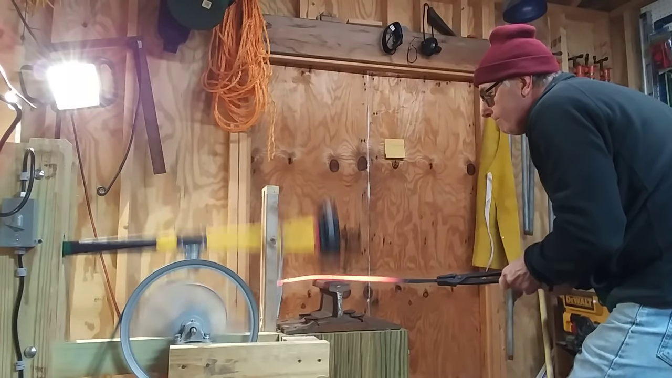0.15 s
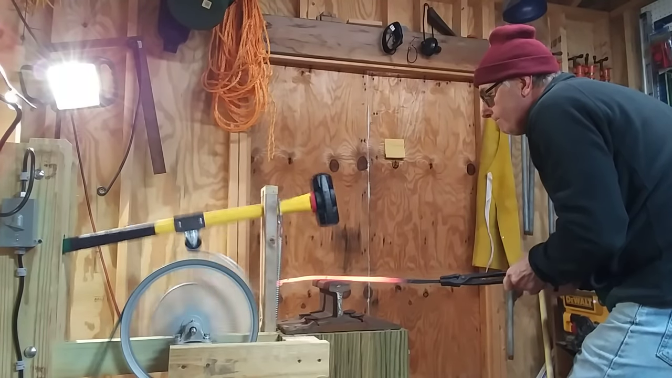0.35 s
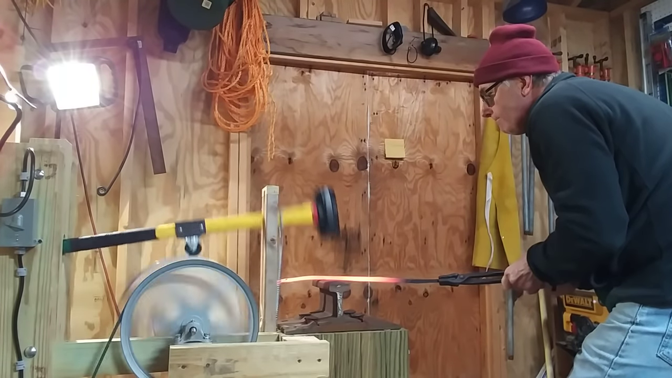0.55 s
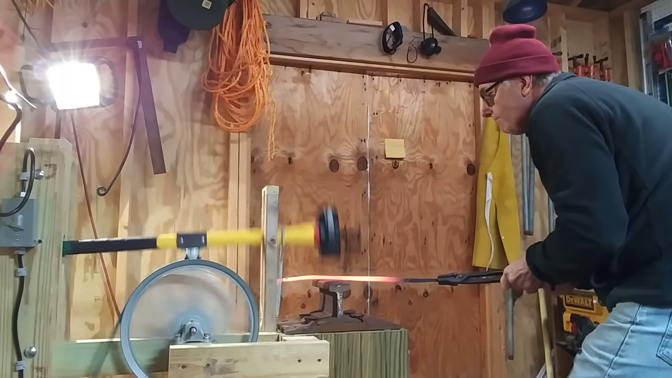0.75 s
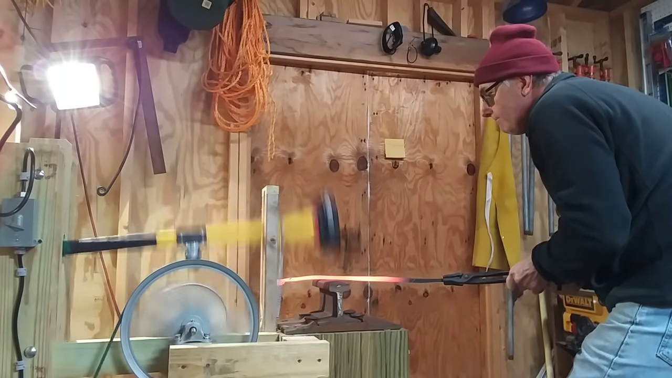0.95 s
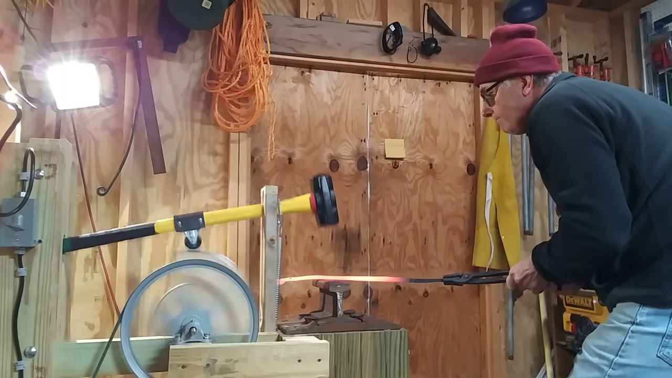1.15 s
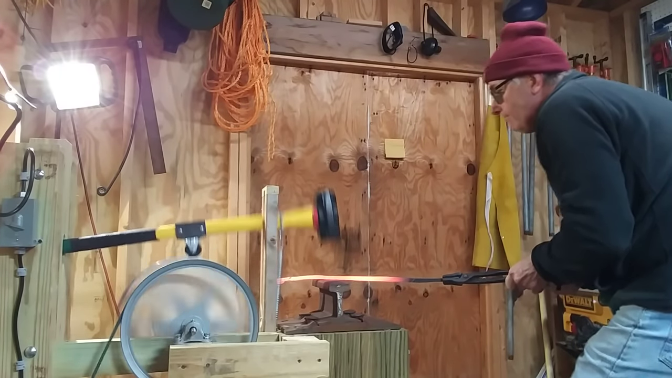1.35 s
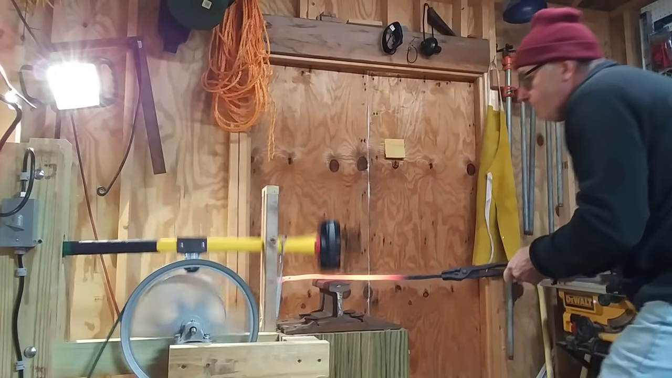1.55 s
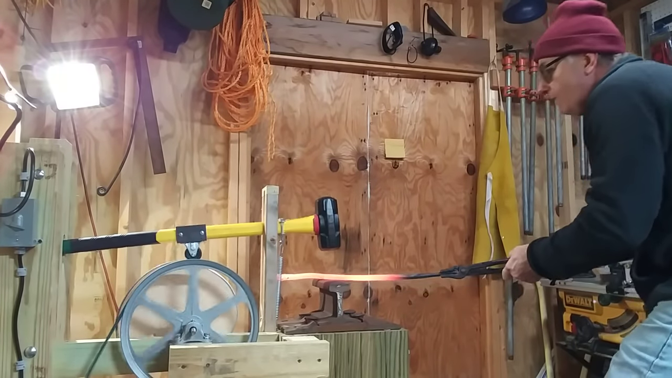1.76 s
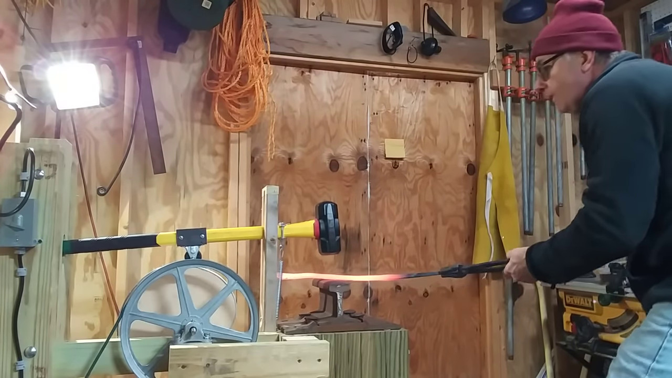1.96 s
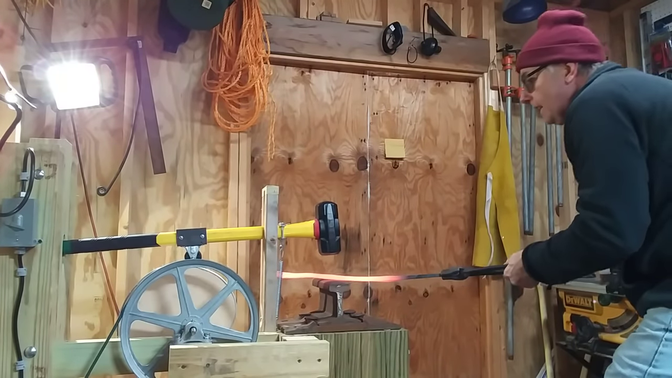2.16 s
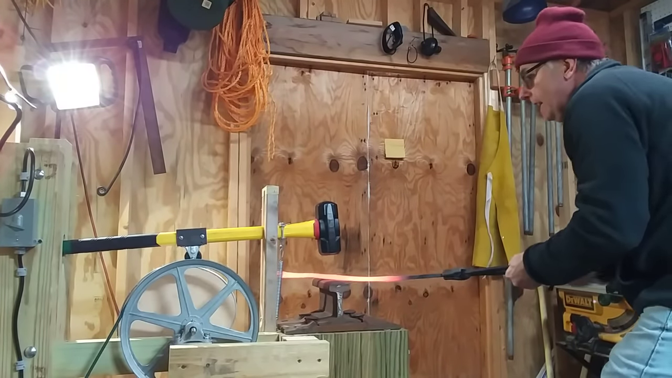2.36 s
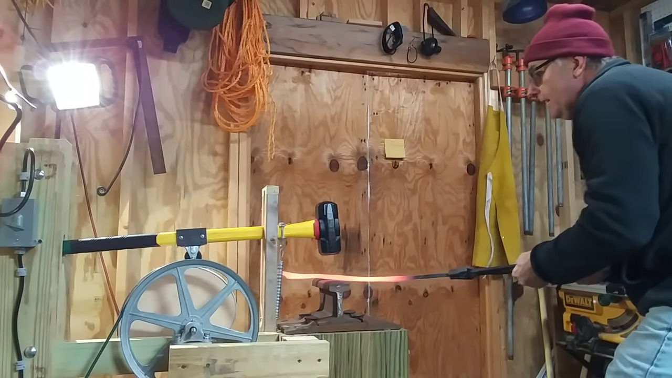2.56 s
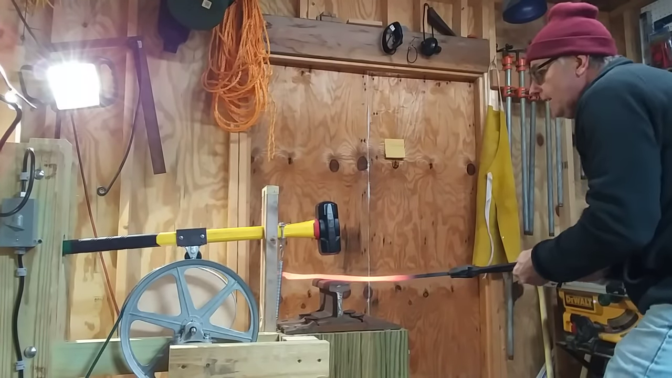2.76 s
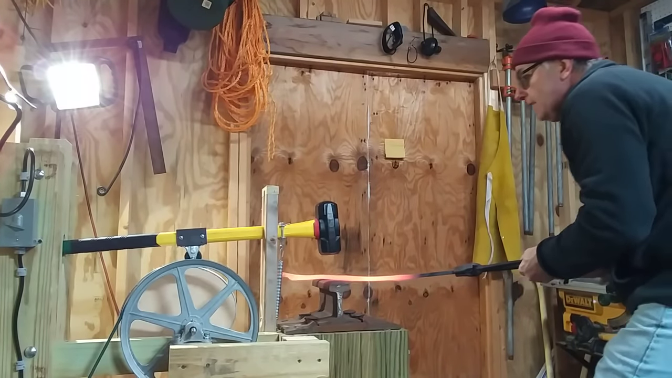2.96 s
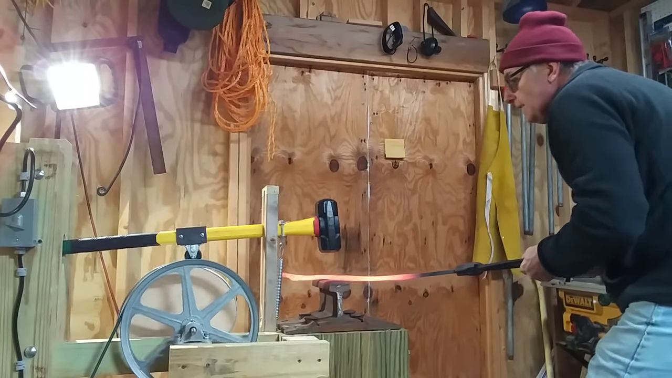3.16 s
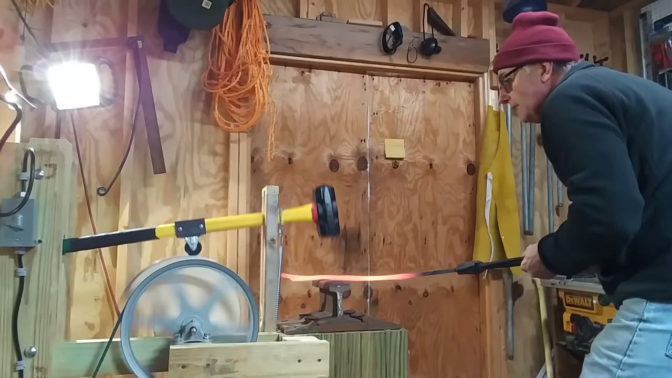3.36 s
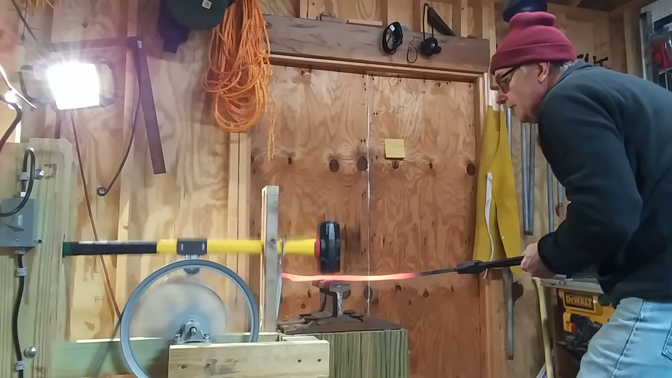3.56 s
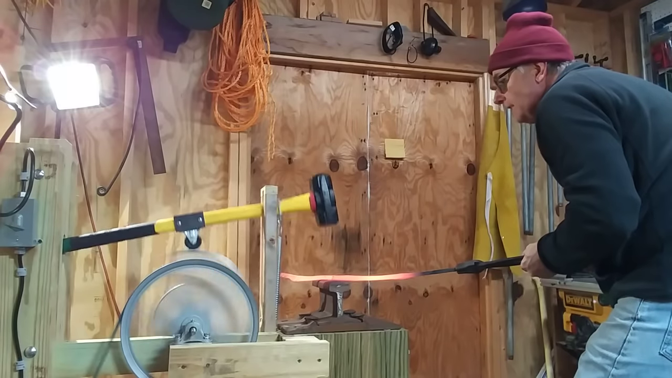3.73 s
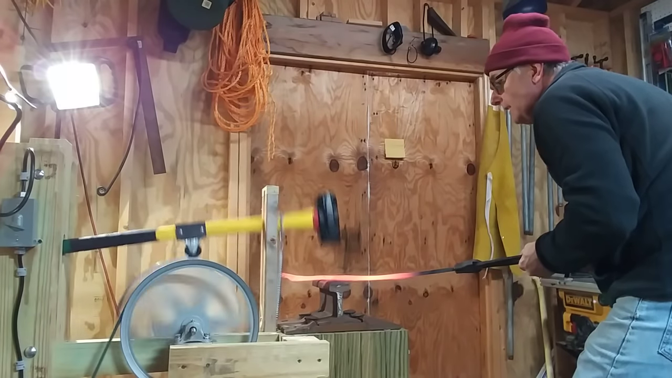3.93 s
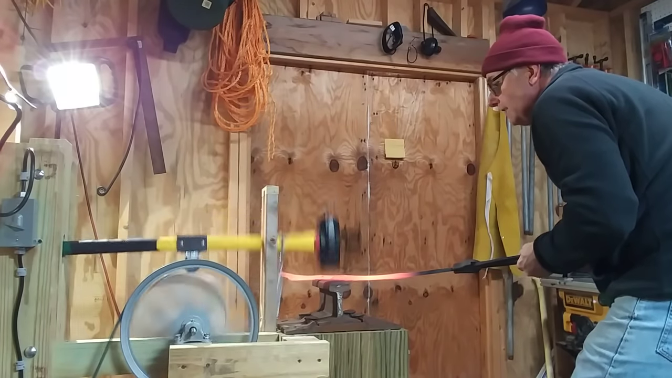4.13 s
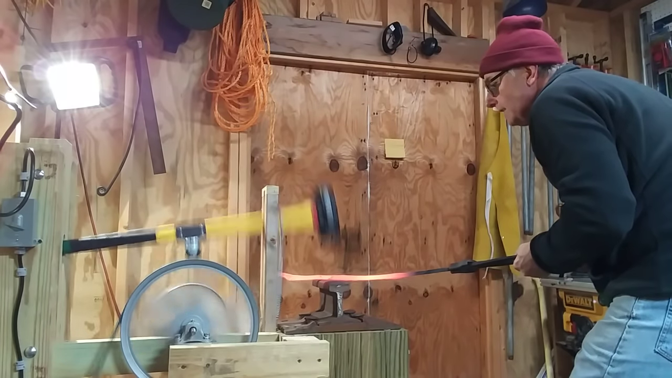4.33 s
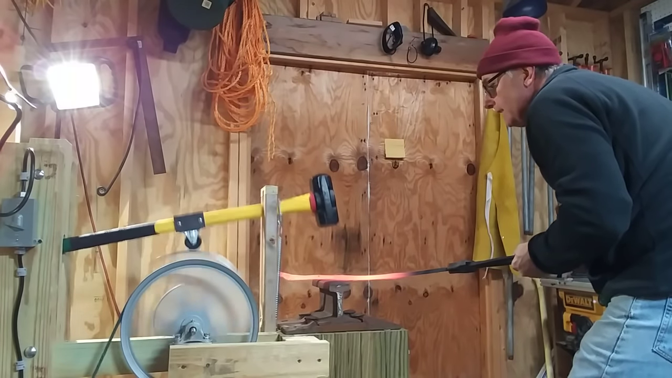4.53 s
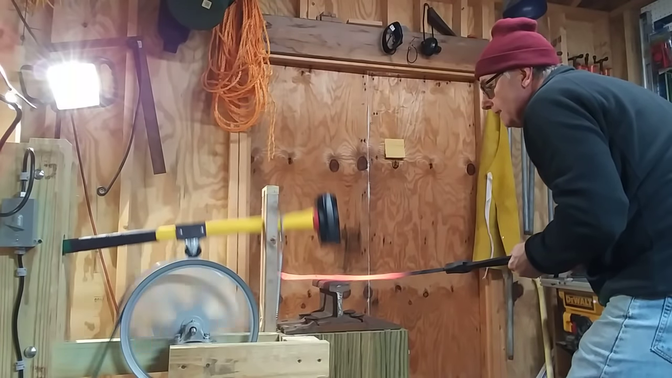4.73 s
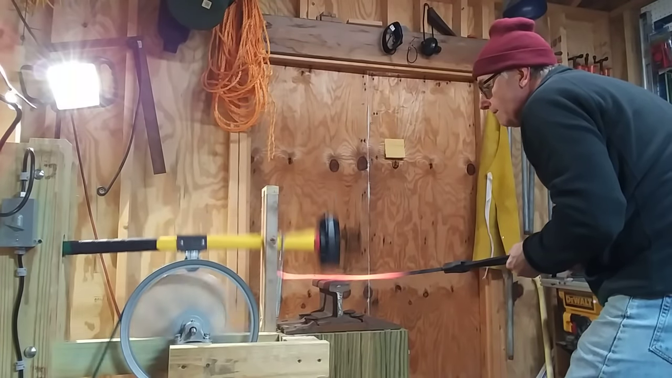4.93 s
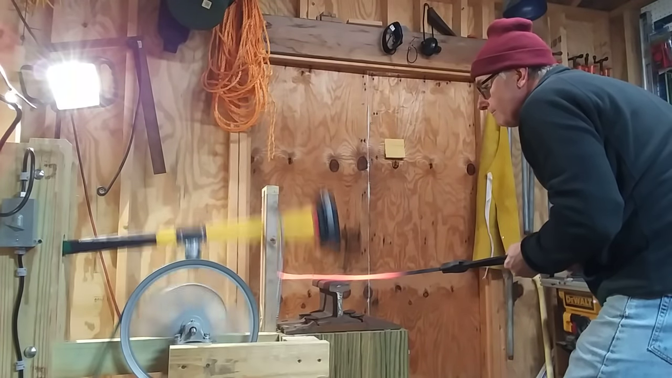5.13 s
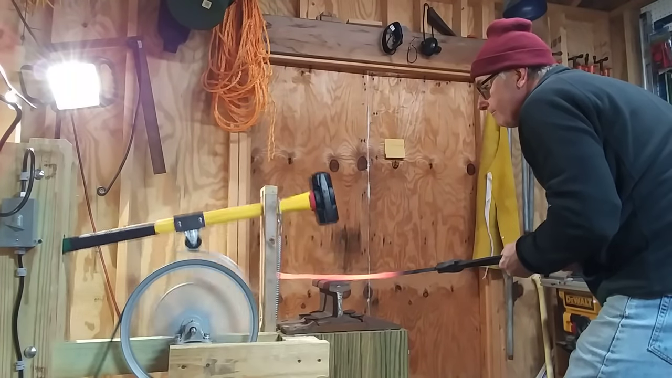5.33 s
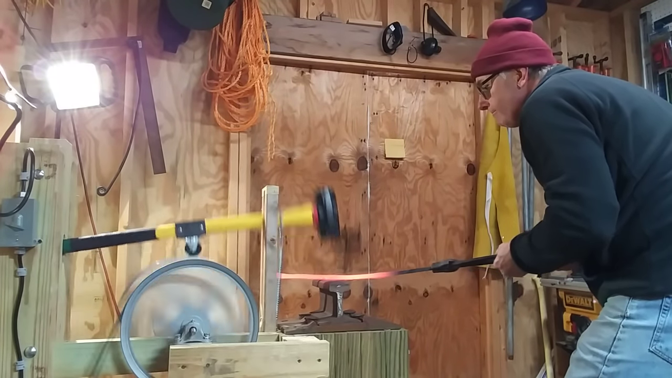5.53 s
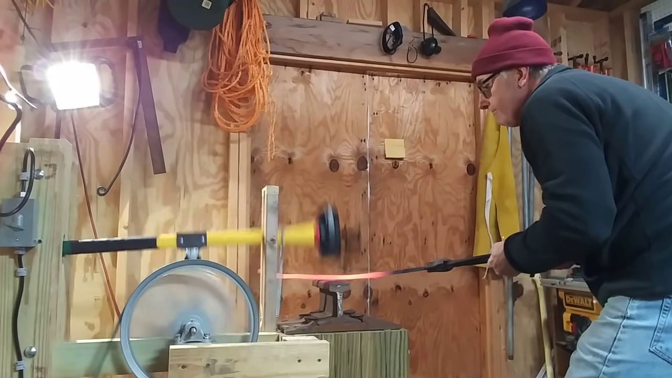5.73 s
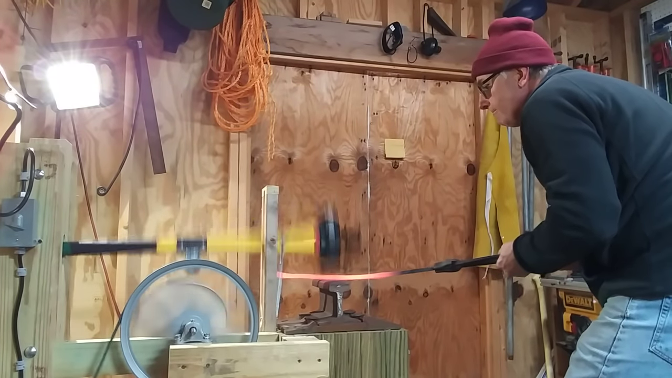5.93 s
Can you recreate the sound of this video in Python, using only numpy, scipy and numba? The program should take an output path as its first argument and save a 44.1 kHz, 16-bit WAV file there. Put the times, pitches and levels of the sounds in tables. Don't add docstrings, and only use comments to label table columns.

```python
import sys
import numpy as np
from scipy import signal
from scipy.fft import rfft, irfft, next_fast_len
from scipy.io import wavfile
from scipy.ndimage import uniform_filter1d, minimum_filter1d, map_coordinates
from numba import njit

SR = 44100
rng = np.random.default_rng(int(sys.argv[2]) if len(sys.argv) > 2 else 0)


def put_to_file(sound):
    columns = np.atleast_2d(sound).T
    safe = np.clip(columns, -1, 1)
    whole_steps = np.round(safe * 32767)
    wavfile.write(sys.argv[1], SR, whole_steps.astype(np.int16))


def decibels_to_gain(level_db):
    exponent = np.asarray(level_db, float) / 20
    return 10 ** exponent


N = 264159
T = np.arange(N) / SR

# time in seconds, belt noise in dB.
EFFORT = [
    (0, -32),
    (1.7, -34),
    (1.85, -34.5),
    (2.0, -35.5),
    (2.5, -38.5),
    (2.98, -38.5),
    (3.1, -35.5),
    (3.45, -35.5),
    (6, -30),
]
# frequency in Hz, level in dB per Hz.
MOTOR_BODY = [(110, -88), (190, -70), (228, -21.5), (446, -16), (586, -12), (882, -9), (927, -8),
              (1310, -5.5), (1500, -22), (2210, -9), (2290, -59), (2380, -16), (3500, -23), (4550, -40),
              (7700, -120)]
MOTOR_HISS = [(150, -28), (215, -1.5), (1760, 3), (3000, 0.5), (3930, -7.5), (4300, -2), (5020, -4),
              (6460, -18), (7500, -26), (8500, -13), (9450, -23.5), (12000, -25), (16000, -36)]
# frequency in Hz, width in Hz, #
# height in dB (negative for a gap).
CASING = [(3420, 33, 6), (3560, 70, -9), (3720, 60, 7), (4060, 190, -12), (4320, 68, 8), (4570, 61, -1),
          (5120, 60, 6), (5300, 43, 7), (5900, 100, -9), (8150, 270, 6.5)]
# multiple of the mains tone, level in dB rms.
MAINS = [(2, -64.5), (3, -58.5), (4, -57), (5, -43), (6, -45.5), (8, -46), (9, -52), (10, -53)]
# frequency in Hz, dB rms.
SHAFT = [(570, -47.5), (806, -51), (1104, -46), (1281, -51.5), (1744, -47), (1965, -59), (2460, -51.5),
         (2760, -56), (3030, -53.5), (4320, -61.5), (4587, -60), (4861, -60)]
COASTING = [(120, -47.5), (330, -55), (505, -52), (1314, -48), (1523, -50), (1583, -50), (1631, -50),
            (1680, -40.5), (2643, -66)]
DRAGGING = [(120, -52), (490, -45.5), (800, -51.5), (1140, -60), (1190, -54), (2420, -56), (1730, -51.5),
            (2700, -51)]
# frequency in Hz, level in dB per Hz.
AIR = [(3000, -30), (6000, -3), (7500, 0), (10000, -3.5), (12500, -11), (15500, -15)]

# start in seconds, peak in dB,
# roller ring in Hz, ring level in dB, scuff level in dB.
CAM = [(0.08, 2, 4570, -42, -13), (0.35, 2.5, 4480, -30, -12), (0.62, 4, 4560, -30, -26),
       (0.891, 3, 4630, -19, -13.5), (1.163, 3.5, 4570, -26, -16.5), (1.445, 0, 4600, -14, -23),
       (1.689, -5, 4600, -34, -32), (3.471, -0.5, 4620, -9.5, -18), (3.741, 5.5, 4400, -11, -17.5),
       (4.013, 2.5, 4300, -11.5, -12.5), (4.282, 3, 4530, -11.5, -12), (4.547, 3, 4450, -7.5, -29),
       (4.812, 2.5, 4640, -8, -15.5), (5.075, 1, 4620, -6, -17), (5.334, 2.5, 4600, -8, -15.5),
       (5.597, 3.5, 4320, -28, -16), (5.857, 1.5, 4640, -12, -13)]
# frequency in Hz, level in dB per Hz.
CAM_COLOUR = [(120, -62), (200, -14.5), (401, -9), (548, -12), (836, 3.5), (916, 0.5), (1020, -0.5),
              (2510, -22.5), (4600, -20), (5230, -25.5), (16000, -46)]
SCUFF_COLOUR = [(1200, -23), (2200, 13.5), (3700, 9.5), (4700, 11), (6300, -13), (7200, -59), (10000, -9),
                (16000, -49)]
# frequency in Hz, level in dB, 60 dB decay in seconds.
ROLLER = [(4408, 2, .14), (4478, 4, .24), (4552, 1, .12), (4645, 3, .12), (9027, -16, .08),
          (9237, -15, .07)]

# start in seconds, peak in dB, brightness in dB, rattle in dB.
BLOWS = [(0.165, -0.5, -3, -5), (0.435, -8.5, -5.5, 2), (0.701, -1.5, -0.5, 0.5), (0.977, -0.5, -2, -3),
         (1.249, -1, 2.5, 3), (1.529, -0.5, 2.5, 4.5), (3.552, -0.5, 2.5, -7), (3.823, -1.5, 5, 4),
         (4.097, -1, 1, 1), (4.365, -0.5, 2.5, 2.5), (4.629, -1.5, 3, 2), (4.895, 0, 3, -1),
         (5.156, -0.5, 2, -1.5), (5.415, -0.5, -0.5, -2), (5.679, -0.5, 1.5, -0.5), (5.937, -1, -1, 1.5)]
# frequency in Hz, level in dB per Hz.
BLOW_COLOUR = [(120, -65), (200, -11.5), (409, -6), (883, 1.5), (1400, -0.5), (2650, -11.5), (3620, -13),
               (6200, -19), (7200, -38), (9500, -25.5), (12000, -36.5), (15500, -34), (16500, -44)]
CRACK_COLOUR = [(1500, -3), (3000, 6), (6000, -11), (10000, 10), (13000, -16), (16000, -29)]
RATTLE_COLOUR = [(1500, 2), (3000, 16), (6000, 4), (10000, -1), (13000, -6.5), (16000, -15)]
# frequency in Hz, width in Hz, height in dB.
FRAME = [(241.4, 45, 4), (303, 15, 3.5), (422.2, 13.7, 11), (492, 99, 5), (716, 40, 3.5), (754, 50, 0),
         (843, 12, 3), (1040, 11, 7.5), (1358, 25, 5.5), (1747, 115, 3), (1850, 91, 1.5), (2087, 260, 5.5),
         (2330, 79, 2), (3010, 29, 9.5), (3450, 12, 1)]
# frequency in Hz, level in dB, 60 dB decay in seconds.
ANVIL = [(2235, -4.5, 0.041), (3030, -17, 0.3), (3500, -25, 0.096)]
# frequency in Hz, 60 dB decay in seconds.
SHOP = [(200, 0.46), (1000, 0.46), (3000, 0.37), (6000, 0.28), (9000, 0.23), (15000, 0.13)]
# seconds after the blow, level in dB.
REBOUNDS = [
    (.011, -4),
    (.019, -3.5),
    (.039, -8),
    (.049, -7),
]
# start in seconds,
# level in dB.
RATTLES = [(-0.001, -31), (0.016, -33), (0.101, -29), (0.183, -22), (0.203, -30), (0.379, -36),
           (0.404, -41), (0.505, -34), (0.566, -37), (0.584, -47), (0.655, -35), (0.687, -26), (0.741, -24),
           (0.77, -30), (0.828, -35), (0.951, -36), (1.064, -34), (1.116, -36), (1.142, -36), (1.172, -33),
           (1.235, -26), (1.292, -25), (1.398, -41), (1.491, -29), (1.602, -30), (1.684, -35), (3.496, -29),
           (3.594, -25), (3.704, -41), (3.808, -32), (3.842, -22), (3.911, -27), (3.929, -32), (3.95, -33),
           (4.003, -43), (4.023, -35), (4.072, -31), (4.291, -26), (4.377, -21), (4.386, -22), (4.403, -22),
           (4.409, -21), (4.495, -35), (4.666, -13), (4.713, -34), (4.821, -22), (5.037, -42), (5.063, -38),
           (5.127, -35), (5.252, -32), (5.272, -37), (5.289, -38), (5.318, -40), (5.369, -36), (5.433, -14),
           (5.438, -26), (5.534, -30), (5.865, -17)]

# start in seconds, peak in dB, brightness in dB.
TICKS = [
    (1.116, -12.5, -3),
    (4.343, -6.5, -4),
    (4.805, -28, 1),
    (5.148, -19, 8),
    (5.404, -15, -1),
]
# start in seconds, peak in dB, brightness in dB.
SHIFTS = [
    (1.75, -44.5, 21),
    (1.96, -38, -21.5),
    (2.06, -37, 8),
    (3.354, -33, -19),
    (3.40, -39, -1),
]
# start in seconds, peak in dB, brightness in dB.
CLATTER = [
    (3.115, -30, -12),
    (3.144, -19.5, 10),
    (3.151, -20.5, 7),
    (3.172, -22, -10),
    (3.186, -22, 7),
    (3.212, -21, 8),
    (3.220, -13, 4.5),
    (3.246, -28, 13),
    (3.256, -14, -27),
]
# start in seconds, level in dB.
PEDAL_CLICKS = [(3.117, -37), (3.126, -41), (3.149, -23), (3.153, -18), (3.185, -29), (3.189, -26),
                (3.197, -25), (3.222, -16), (3.226, -20), (3.249, -21), (3.258, -26), (3.268, -27),
                (3.279, -30), (3.286, -32)]
# frequency in Hz, level in dB per Hz.
SMALL_COLOUR = [(120, -60), (200, -34), (420, -16), (820, -2.5), (1180, -3.5), (1770, -1), (3070, -15.5),
                (5700, -10.5), (6500, -25), (9500, -24), (16000, -39)]
# frequency in Hz, width in Hz, height in dB.
PEDAL = [(1450, 60, 9), (1780, 57, 12.5), (2070, 60, 9), (2590, 65, 14), (3080, 140, 17), (3500, 160, 13.5),
         (4040, 110, 17), (4600, 120, 10), (4900, 120, 12), (5660, 90, 5), (8100, 80, 12), (8700, 150, 8)]
TONGS = [(6130, 60, 11), (7100, 60, 8), (8150, 60, 17), (10850, 90, 11), (11820, 90, 14), (12700, 90, 12),
         (13800, 80, 6), (14700, 120, 12)]
# start in seconds, level in dB, length factor.
BRUSH = [(1.8, -55, 0.74), (1.86, -58, .6), (1.935, -55, 0.28), (2.03, -56, .3), (2.12, -51, 0.46),
         (2.17, -51.5, 0.87), (2.25, -55, 0.89), (2.997, -50, .6), (3.03, -53, .6), (3.08, -62, .8),
         (3.279, -55, 0.8), (3.32, -61, .8), (3.353, -52, 0.9), (3.41, -56, .8)]
# frequency in Hz, level in dB per Hz.
BRUSH_COLOUR = [(4000, -30), (6000, 1), (8100, -3), (9500, 1), (11300, -9), (12200, -9), (15500, -11)]
# (start in seconds, level in dB).
LOOSE = [
    (2650, 0.6, [(3.36, -35)]),
    (3740, 0.15, [(.14, -17), (.64, -16), (.68, -21), (4.34, -24), (4.6, -35), (4.85, -20)]),
    (4800, 0.18, [(1.462, -21)]),
    (5350, 0.19, [(1.285, -19)]),
    (5950, 0.41, [(3.57, -21.5), (4.41, -32), (5.95, -28)]),
    (6130, 0.16, [(1.93, -45), (2.055, -42), (2.12, -40), (2.165, -43)]),
    (6300, 0.3, [(5.73, -40)]),
    (7000, 0.2, [(3.445, -52)]),
    (9550, 0.28, [(3.0, -43), (5.2, -40)]),
]
# start in seconds, level in dB.
FOOTFALLS = [
    (1.799, -32),
    (1.965, -24.5),
    (3.37, -35),
]
# frequency in Hz, level in dB, 60 dB decay in seconds.
FLOOR = [(93, -1.5, 0.66), (208, -43, 0.24), (321, -10, 0.27)]


def unit(x):
    return x / np.sqrt(np.mean(x ** 2) + 1e-20)


def along(points, hz):
    f, v = np.transpose(points)
    return np.interp(np.log(hz + 1), np.log(f + 1), v)


def wobble(rate):
    knots = rng.standard_normal(int(N * rate / SR) + 4)
    return map_coordinates(knots, [T * rate])


def coloured(spectrum, peaks=()):
    m = next_fast_len(N + 8192)
    hz = np.fft.rfftfreq(m, 1 / SR)
    humps = sum(db / (1 + (2 * (hz - c) / w) ** 2) for c, w, db in peaks)
    shaped = rfft(rng.standard_normal(m)) * decibels_to_gain(along(spectrum, hz) + humps)
    return unit(irfft(shaped, m)[:N])


def dying(noise, hits, stretch):
    patchy_db = 1.22
    hz, t, z = signal.stft(noise, SR, nperseg=128, noverlap=96)
    power = np.zeros(z.shape)
    high = np.clip(np.log2((hz[:, None] + 1) / 2000) / 2, 0, 1)
    t60 = stretch * along(SHOP, hz)[:, None]
    for s, db, bright_db, factor in hits:
        age = t - s - .0015
        on = (age >= 0) & (age < 1)
        power[:, on] += decibels_to_gain(2 * (db + bright_db * high - 60 * age[on] / (factor * t60)))
    patches = uniform_filter1d(rng.standard_normal(z.shape), size=2, axis=0)
    patches = unit(uniform_filter1d(patches, size=20, axis=1))
    z = z * np.sqrt(power) * decibels_to_gain(patchy_db * patches)
    return signal.istft(z, SR, nperseg=128, noverlap=96)[1][:N]


def rings(hits, rise, unsteady=0.093):
    out, t = np.zeros(N + SR), T[:SR // 2]
    for s, hz, db, t60 in hits:
        drift = np.cumsum(rng.normal(0, unsteady, len(t)))
        envelope = decibels_to_gain(db - 60 * t / t60) * (1 - np.exp(-t / rise))
        out[round(s * SR):][:len(t)] += envelope * np.sin(2 * np.pi * hz * t + drift)
    return out[:N]


def ticks(hits, t60):
    s, db = np.transpose(hits)
    places = np.clip(np.round(s * SR).astype(int), 0, N - 1)
    starts = np.bincount(places, decibels_to_gain(db), N)
    decay = signal.lfilter([1], [1, -decibels_to_gain(-60 / (t60 * SR))], starts)
    return uniform_filter1d(decay, size=13)


def steady_lines(table, waver_db, wander):
    total = np.zeros(N)
    for hz, db in table:
        phase = 2 * np.pi * hz * T + wander * hz * wobble(25) + rng.uniform(0, 2 * np.pi)
        total += decibels_to_gain(db + waver_db * wobble(6.0)) * np.sin(phase)
    return total


def motor():
    clutch_out_s, settled_s, pedal_s, clutch_in_s = 1.75, 2.1, 2.93, 3.47
    mains_hz, whine_hz, pulley_per_s, pulley_beat_s = 120, 2153, 22.6, 2.14
    idle_hiss_db, pedal_hiss_db, run_hiss_db = -5.5, -3, -2.5
    loaded = np.interp(T, [clutch_out_s - .05, clutch_out_s + .1, clutch_in_s, clutch_in_s + .05], [1, 0, 0, 1])
    pressed = np.interp(T, [pedal_s + 0.02, pedal_s + 0.08], [0, 1])
    turn = 2 * np.pi * pulley_per_s * (T - pulley_beat_s)

    buzz_db = 0.31 * np.sin(2 * np.pi * mains_hz * T)
    body_db = 0.28 * np.cos(turn) + buzz_db + 0.7 * wobble(3.7) + 1.0
    body = decibels_to_gain(body_db) * coloured(MOTOR_BODY, CASING)
    hiss_db = idle_hiss_db + (pedal_hiss_db - idle_hiss_db) * pressed * (1 - loaded)
    hiss_db = hiss_db + (run_hiss_db - idle_hiss_db) * loaded
    hiss_db = hiss_db + 0.25 * np.cos(turn) + 0.71 * wobble(8.5) + 1.8 * wobble(90)
    hiss = decibels_to_gain(hiss_db) * coloured(MOTOR_HISS, CASING)
    belt = decibels_to_gain(np.interp(T, *np.transpose(EFFORT))) * (body + hiss)

    idle = steady_lines([(k * mains_hz, db) for k, db in MAINS], waver_db=0.8, wander=1e-4)
    idle += decibels_to_gain(2.5 * np.cos(turn)) * steady_lines(SHAFT, waver_db=2.5, wander=4e-4)
    idle *= decibels_to_gain(-23 * np.interp(T, [pedal_s + 0.022, pedal_s + 0.2], [0, 1]))
    coast = steady_lines(COASTING, waver_db=1.5, wander=1.5e-4)
    coast *= decibels_to_gain(-32 * np.maximum(T - settled_s, 0))
    drag = steady_lines(DRAGGING, waver_db=3.5, wander=3e-4)
    drag *= decibels_to_gain(-67 * np.maximum(pedal_s - T, 0))

    carrier = 2 * np.pi * whine_hz * T
    sideband = np.interp(T, [2.75, 2.87], [.85, .5]) * decibels_to_gain(.6 * wobble(5))
    whine = np.sin(carrier) + sideband * np.sin(carrier + turn + .3 * wobble(5))
    whine_db = -44.5 - 31 * np.clip(settled_s - T, 0, 0.3) + 2.5 * np.clip(T - settled_s, 0, 1)
    whine_db -= 6.7 * np.interp(T, [pedal_s - 0.035, pedal_s - 0.015], [0, 1])
    hum = idle + decibels_to_gain(whine_db) * whine + coast + drag

    running_down = (T < clutch_in_s) * np.exp(-np.maximum(T - clutch_out_s, 0) / 0.23) / 2
    air_db = -52 + 3.6 * wobble(70) + 1.9 * wobble(12)
    air = np.maximum(loaded, running_down) * decibels_to_gain(air_db) * coloured(AIR)
    return air + belt + decibels_to_gain(-10 * loaded + 4) * hum


def cam(drive_db):
    knock_hits = [(s + .0012, db + drive_db, -4.5, 1) for s, db, *_ in CAM]
    knock = dying(coloured(CAM_COLOUR, FRAME), knock_hits, stretch=1.0)

    scuff = np.zeros(N)
    for s, db, *_, scuff_db in CAM:
        age = np.maximum(T - s - .0008, 0)
        rub = 1 / (1 + (age / 0.016) ** 5) + 0.27 * decibels_to_gain(-60 * age / 0.0036)
        scuff += (1 - np.exp(-age / .0008)) * decibels_to_gain(db + drive_db + scuff_db) * rub
    reseat = [(s + 0.0092, db + drive_db + scuff_db - 12) for s, db, *_, scuff_db in CAM]
    scuff += ticks(reseat, t60=0.022)
    scuff = scuff * decibels_to_gain(2.5 * wobble(200)) * coloured(SCUFF_COLOUR)

    roller = []
    for s, db, hz, ring_db, _ in CAM:
        for mode, level, t60 in ROLLER:
            off_pitch_db = .03 * min(abs(mode - hz), abs(mode / 2 - hz))
            roller.append((s + 0.001016, mode, db + drive_db + ring_db + level - off_pitch_db, t60))
    beam = [(s, 850 * rng.normal(1, 0.0167), db + drive_db - 11.5, .3) for s, db, *_ in CAM]
    return knock + scuff + rings(roller, rise=.008, unsteady=.04) + rings(beam, rise=.002)


def blows(drive_db):
    roar_hits = [(-0.1, 0, -12, 1.6)]
    steel, loose, chatter = [], [], []
    gate, snap = np.zeros((2, N))
    for s, db, bright_db, rattle_db in BLOWS:
        peak_db = db + drive_db
        roar_hits.append((s + 0.0012, peak_db, bright_db, 1 - 0.11 * db))
        for hz, level, t60 in ANVIL:
            steel.append((s + 0.001116, hz, peak_db + level + rng.normal(0, 3.3), t60))
        steel.append((s + 0.002, 438 * rng.normal(1, 0.038), peak_db - 1.5, 0.12))
        for _ in range(9):
            hz = 1500 * 2 ** rng.uniform(0, 1.1)
            loose.append((s + rng.uniform(0, .06), hz, peak_db - 18 + rng.normal(0, 2.5), .14))
        for lag, level in REBOUNDS:
            bounce_db = peak_db + rattle_db + level - 16.5 + rng.normal(0, 2.8)
            chatter.append((s + lag * rng.normal(1, 0.073), bounce_db))
        age = np.maximum(T - s - .0012, 0)
        snap += (age > 0) * decibels_to_gain(peak_db + bright_db - 16.0 - 60 * age / 0.0046)
        gate += (age > 0) * decibels_to_gain(peak_db + rattle_db - 16.5) / (1 + (age / 0.037) ** 6)
    roar = dying(coloured(BLOW_COLOUR, FRAME), roar_hits, stretch=0.88)
    gate += ticks(chatter, t60=0.022) + decibels_to_gain(3) * ticks(RATTLES, t60=0.018)
    rattle = gate * decibels_to_gain(2.0 * wobble(250)) * coloured(RATTLE_COLOUR)
    crack = snap * coloured(CRACK_COLOUR)
    return roar + rings(steel, rise=0.00023) + rings(loose, rise=0.0065) + rattle + crack


def small_parts():
    grit = unit(decibels_to_gain(1.2 * wobble(300)) * coloured(SMALL_COLOUR, PEDAL))
    hits = []
    for table, length in [(CLATTER, 0.2), (TICKS, 0.055), (SHIFTS, 0.78)]:
        hits += [(*hit, length) for hit in table]
    clacks = dying(grit, [(s, db - 5.5, bright, length) for s, db, bright, length in hits], stretch=3.04)
    clicks = dying(grit, [(s, db - 28, bright + 4, 1) for s, db, bright, _ in hits], stretch=0.2)
    clicks = clicks + decibels_to_gain(-1.5) * ticks(PEDAL_CLICKS, t60=0.019) * coloured(RATTLE_COLOUR, PEDAL)
    brush_hits = [(s, db, 1.5, length) for s, db, length in BRUSH]
    brush = dying(coloured(BRUSH_COLOUR, TONGS), brush_hits, stretch=2.1)

    strays = [(s, hz, db, t60) for hz, t60, times in LOOSE for s, db in times]
    strays += [(s + 0.042, 9900, -39, 0.3) for s, *_ in BLOWS if 3.7 < s < 5.3]
    strays += [(s, hz, db + level, t60) for s, db in FOOTFALLS for hz, level, t60 in FLOOR]
    return clacks + clicks + brush + rings(strays, rise=0.0087, unsteady=0.04)


def scene():
    return (motor() + cam(drive_db=-5.5) + blows(drive_db=7) + small_parts())[None]


@njit
def recover(need, step):
    out, g = np.empty_like(need), 1.0
    for i in range(len(need)):
        g = min(need[i], g + (1 - g) * step)
        out[i] = g
    return out


def gated_top(x, edge, gate_db, size):
    hz, _, z = signal.stft(x, SR, nperseg=size, noverlap=size * 3 // 4)
    level = np.sqrt(np.abs(uniform_filter1d(np.abs(z) ** 2, size=9, axis=1)))
    shut = (hz[:, None] > edge) / (1 + (level / decibels_to_gain(gate_db)) ** 8)
    return signal.istft(z * (1 - shut), SR, nperseg=size, noverlap=size * 3 // 4)[1][:N]


def band_limit(x):
    return signal.sosfilt(signal.butter(12, 16510, fs=SR, output="sos"), x)


def record(dry):
    x = signal.sosfilt(signal.butter(6, 210, "high", fs=SR, output="sos"), dry[0])
    top = .63
    need = np.minimum(1, 0.8 * top / (np.abs(x) + 1e-9))
    gain = recover(need, 1 / (SR * 0.015))
    x = x * uniform_filter1d(minimum_filter1d(gain, size=9), size=5)
    x = x / (1 + np.abs(x / top) ** 12) ** (1 / 12)
    x = gated_top(x, 10250, gate_db=-87.5, size=1024)
    x = gated_top(x, 15750, gate_db=-52, size=256)
    return band_limit(x[None])


dry = scene()
out = record(dry)
put_to_file(out)
```